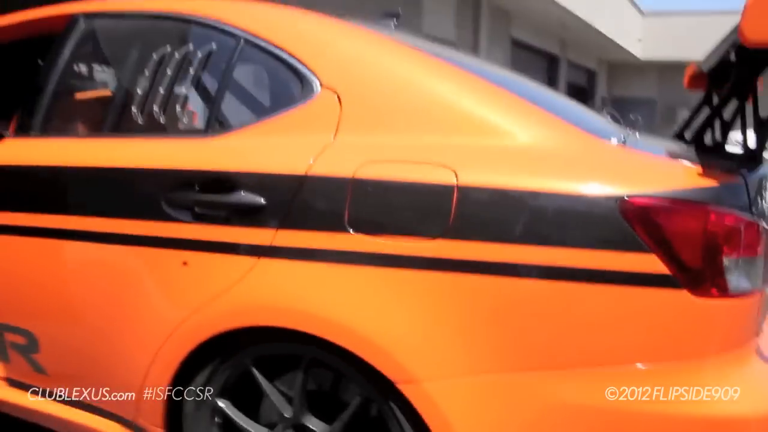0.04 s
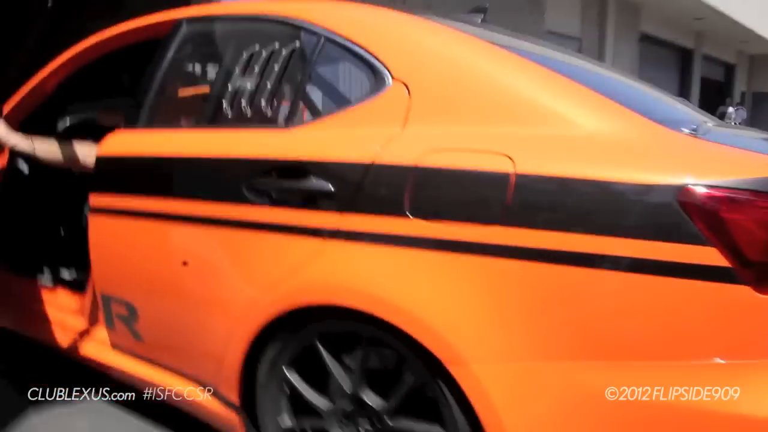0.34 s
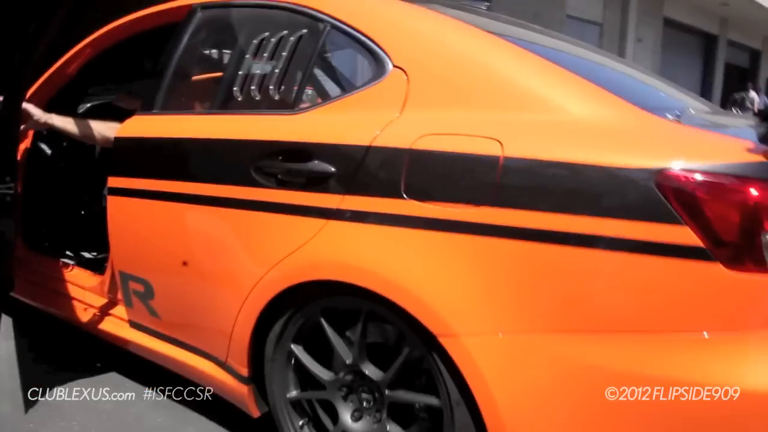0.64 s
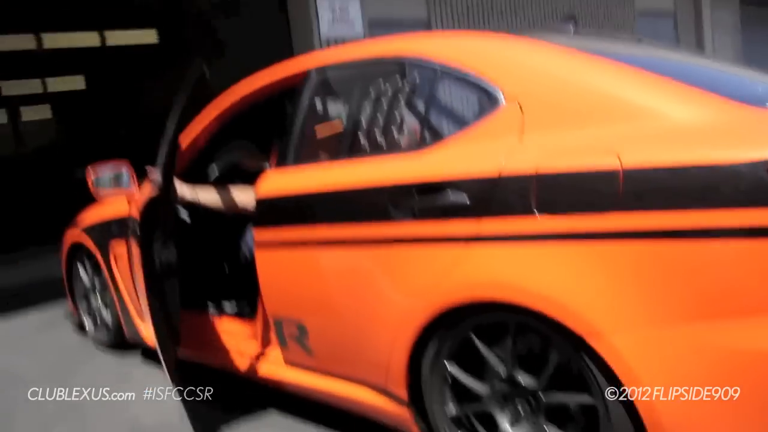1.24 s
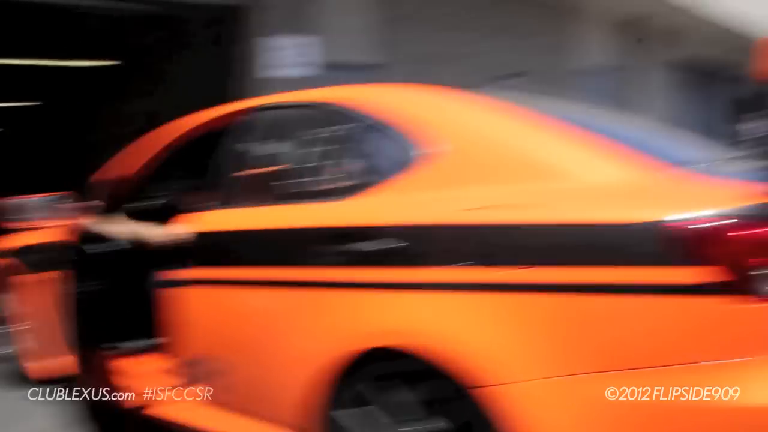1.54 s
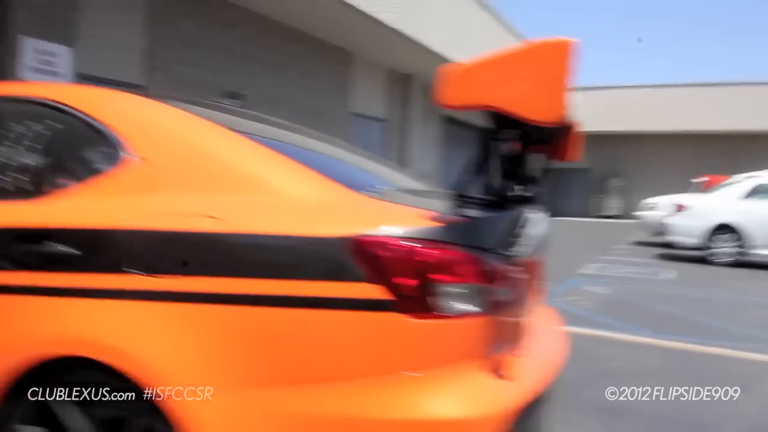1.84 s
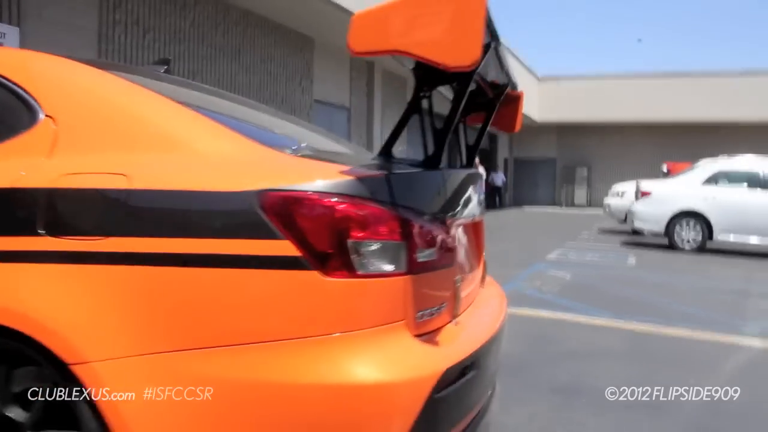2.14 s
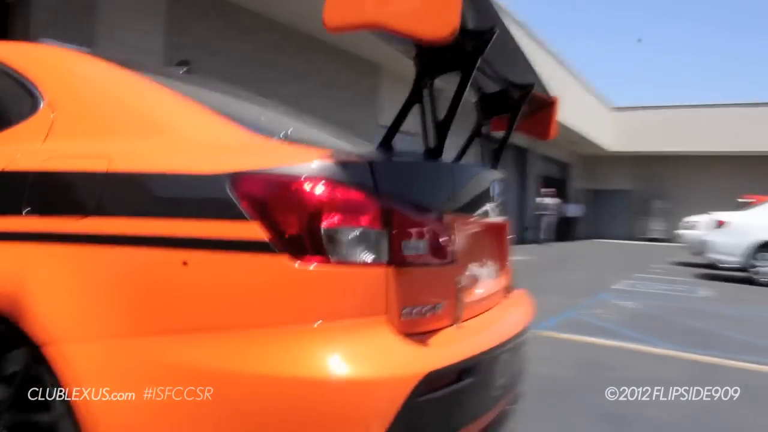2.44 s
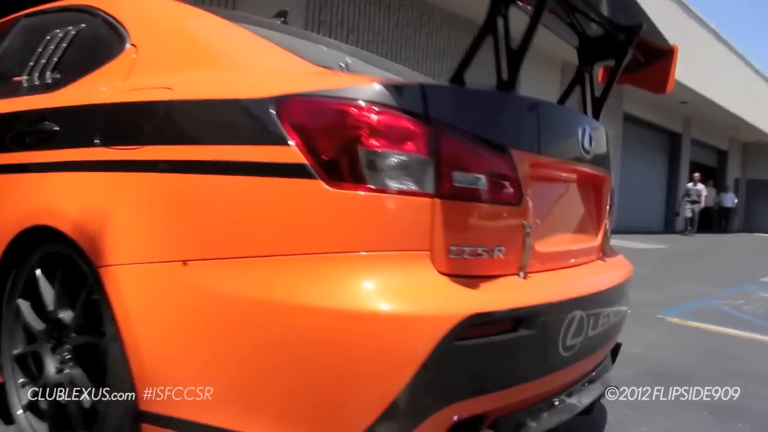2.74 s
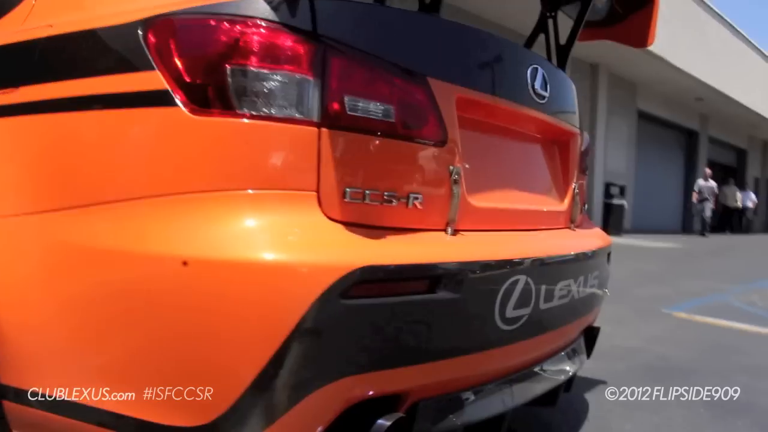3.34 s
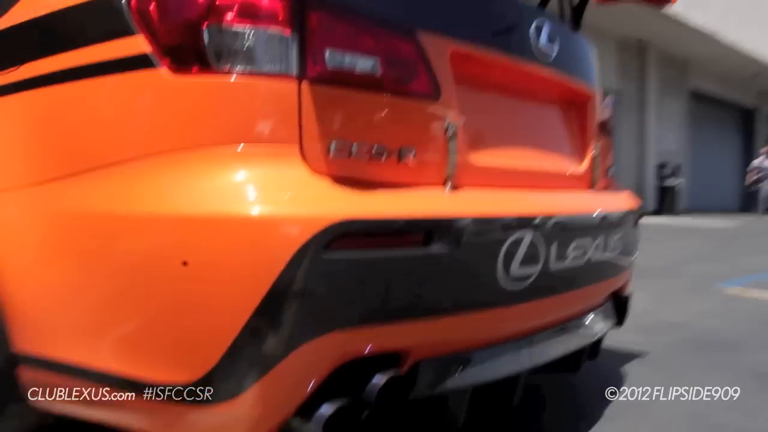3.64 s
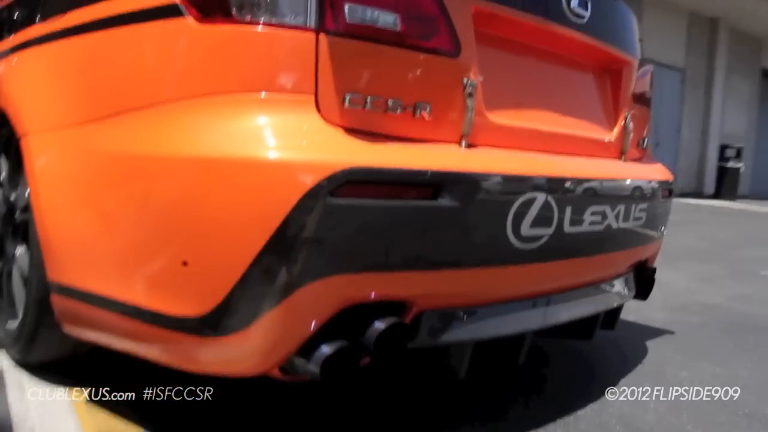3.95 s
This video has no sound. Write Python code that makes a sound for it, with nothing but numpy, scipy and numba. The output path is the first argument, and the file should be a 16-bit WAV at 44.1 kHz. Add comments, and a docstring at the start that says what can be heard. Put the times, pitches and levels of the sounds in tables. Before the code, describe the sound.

A race car engine idles with a low burble, then revs up with exhaust cracks, winds down and revs again, higher. It is parked beside a building, and the close microphone overloads slightly on the revs.

```python
"""A cross-plane V8 race car idles, then revs twice, close by in a parking lot.
Its two banks fire unevenly into the tailpipes: an even firing tone, a loping beat between the banks
and a rasp of gas, with cracks, barks and booms on the throttle. The revs overload the microphone,
and the gain control pushes the hiss of the engine bay down."""
import sys
import numpy as np
from scipy import signal
from scipy.fft import rfft, irfft
from scipy.io import wavfile
from numba import njit

SR = 44100
rng = np.random.default_rng(int(sys.argv[2]) if len(sys.argv) > 2 else 0)


def to_wav(sig):
    """Store sig (one row per channel, or 1-D mono) as 16-bit WAV at the path in sys.argv[1].

    Samples outside -1..1 are clipped; the rate is SR.
    """
    pcm = np.clip(np.atleast_2d(sig), -1, 1) * 32767
    pcm = np.round(pcm).astype(np.int16)
    wavfile.write(sys.argv[1], SR, pcm.T)  # frames by channels


N = 176400

# engine speed: t/s, four-stroke cycle rate/Hz
SPEED = [(0, 7.2), (1.14, 7.2), (1.25, 8.7), (1.4, 13.5), (1.45, 16.2), (1.58, 24.3), (1.76, 34.6),
         (1.88, 41), (2.0, 47.4), (2.07, 49.5), (2.15, 49), (2.4, 44), (2.67, 38.2), (3.08, 31),
         (3.25, 28.8), (3.37, 28.5), (3.43, 30.4), (3.67, 42.8), (3.84, 52.4), (3.93, 55.2), (4, 55.1)]
# exhaust under throttle: t/s, bank beat/dB, firing tone/dB, rasp/dB, firing scatter/share
EXHAUST = [(1.17, -45, -30, -31, .2), (1.25, -2, -2, -21, 0.07), (1.41, -17.5, 4, -18, 0.31),
           (1.55, 11, 11, -22, 0.24), (1.75, 17.5, 16, -1.5, 0.076), (1.9, 21, -5, -21, 0.087),
           (2.0, 15, 12, 8.5, 0.097), (2.12, 16, 1.5, -5.5, 0.37), (2.22, 15, 10.5, -7.5, 0.029),
           (2.55, 16.5, -5, -8.5, .03), (2.8, 14, -35, -11, 0.03), (2.95, 10.5, -52, -15, .04),
           (3.35, 6.5, -32, -20, 0.26), (3.41, 14, 7, -14, .13), (3.6, 18, 6.5, -3.5, 0.14),
           (3.83, 17.5, 21, 5, 0.1), (4.0, 13.5, 16, -5.5, 0.31)]
# pipe response to barks and cracks: f/Hz, gain/dB
BARK_PIPE = [(100, 9.5), (1050, 13), (2500, -5), (16000, -33)]


def undb(db):
    """Decibels to gain."""
    return 10 ** (np.asarray(db) / 20)


def curve(rows, at, column=1):
    """One table column, linearly interpolated."""
    rows = np.array(rows, float)
    return np.interp(at, rows[:, 0], rows[:, column])


def colour(x, response):
    """Minimum-phase filter; response: f/Hz, gain/dB."""
    size = 2 ** 18
    hz, db = np.array(response, float).T
    f = np.maximum(np.arange(size // 2 + 1) * SR / size, 1)
    cepstrum = irfft(np.log(undb(np.interp(np.log(f), np.log(hz), db))))
    cepstrum[1:size // 2] *= 2
    cepstrum[size // 2 + 1:] = 0
    return irfft(rfft(x, size) * np.exp(rfft(cepstrum)))[:N]


def pulses(times_s, sizes):
    """A click at each time, split between two samples."""
    whole, part = np.divmod(np.clip(times_s * SR, 0, N), 1)
    whole = whole.astype(int)
    clicks = np.bincount(whole, sizes * (1 - part), N + 2) + np.bincount(whole + 1, sizes * part, N + 2)
    return clicks[:N]


@njit
def follow(x, start, attack_s, release_s):
    """One-pole level follower."""
    attack, release = 1 / (attack_s * SR), 1 / (release_s * SR)
    out, level = np.empty(len(x)), start
    for i in range(len(x)):
        level += (x[i] - level) * (attack if x[i] > level else release)
        out[i] = level
    return out


def resonance(hz, width_hz):
    """Noise ringing in one resonance, rms 1."""
    ring = signal.lfilter(*signal.iirpeak(hz, hz / width_hz, SR), rng.standard_normal(N))
    return ring / np.std(ring)


def gas(envelope, pipe):
    """Turbulent puffs coloured by the pipe mouth; the envelope sets the rms."""
    puffs = colour(rng.standard_normal(N) * envelope, pipe)
    return puffs / np.std(colour(rng.standard_normal(N), pipe))


def engine_bay(t):
    """Hiss and a ringing belt drive that scuffs twice."""
    # hiss spectrum: f/Hz, gain/dB
    hiss_spectrum = [(40, -42), (200, 7.5), (1020, 0), (1350, -3.5), (2400, -6), (6800, -11), (11400, -18),
                     (16000, -31)]
    # hiss envelope: t/s, level/dB
    hiss_db = [(0, -26), (1.15, -20.5), (1.5, -21.5), (2.1, -5), (2.8, -23.5), (3.0, -18), (3.3, -25.5),
               (4, -17)]
    # belt resonances: f/Hz, width/Hz, level at idle/dB
    belt_modes = [(1886, 5.8, -32.5), (1612, 70, -34)]
    # belt scuffs: t/s, half-width/s, rise/dB
    scuffs = [(0.365, 0.023, 5), (.945, .017, 6.5)]
    scuff_gain = undb(sum(db * np.exp(-((t - at) / width) ** 2) for at, width, db in scuffs))
    belt_gain = np.sqrt(SPEED[0][1] / curve(SPEED, t))  # rings most at idle
    belt = belt_gain * sum(undb(db) * resonance(hz, width) for hz, width, db in belt_modes)
    hiss = colour(rng.standard_normal(N), hiss_spectrum)
    return scuff_gain * (hiss / np.std(hiss) * undb(curve(hiss_db, t)) + belt)


def booms(t):
    """A low pipe resonance swells and dies as the throttle snaps open or shut."""
    # booms: t/s, half-width/s, f/Hz, level/dB
    swells = [(1.2, .028, 173, 5.5), (2.125, 0.031, 140.6, 12.5), (3.968, 0.038, 99, 15)]
    return sum(undb(db) * np.exp(-((t - at) / width) ** 2) * np.sin(2 * np.pi * hz * (t - at))
               for at, width, hz, db in swells)


def cracks(t, decay_s=.004):
    """Single hard firings burst from the pipe as the engine picks up."""
    # hard firings: t/s, level/dB
    bursts = [(1.289, -8), (1.427, 4), (1.487, 7), (1.538, 9), (1.582, 9), (1.68, 10), (3.259, -2),
              (3.363, 0), (3.468, 14)]
    envelope = sum(undb(db) * (t >= at) * np.exp(-np.abs(t - at) / decay_s) for at, db in bursts)
    return gas(envelope, BARK_PIPE)


def barks(t, decay_s=.006):
    """Under load the loudest cylinder blasts from the pipe once a cycle."""
    # bark envelope: t/s, level/dB
    bark_db = [(1.3, -70), (1.7, -10), (1.83, 9), (1.99, 17), (2.1, -30), (3.35, -30), (3.43, 2), (3.58, 5),
               (3.62, 15), (3.76, 22), (3.86, 19), (3.92, 3)]
    anchors_s = (1.838, 3.619)  # one bark per rev times the rest
    cycle_hz = curve(SPEED, t)
    cycle = np.cumsum(cycle_hz) / SR
    anchor_cycle = np.where(t < np.mean(anchors_s), *np.interp(anchors_s, t, cycle))
    age_s = (cycle - anchor_cycle) % 1 / cycle_hz
    return gas(undb(curve(bark_db, t)) * np.exp(-age_s / decay_s), BARK_PIPE)


def snarl(t):
    """Clean pipe overtones glide with the engine and mellow as it runs down."""
    # overtones: multiple of cycle rate, level before tilt/dB re bank beat
    overtones = [(6, -14), (10, -15), (12, -21), (13, -20), (15, -21), (18, -22), (20, -23), (21, -21),
                 (23, -22), (25, -21), (26, -24), (28, -24)]
    # brightness: t/s, tilt about the 10th multiple/(dB/octave)
    brightness = [(2.15, -4), (2.8, -3.5), (2.95, -8), (3.33, -6), (3.42, 4), (3.75, 0.5)]
    cycle = np.cumsum(curve(SPEED, t)) / SR
    tilt = curve(brightness, t)
    tones = sum(undb(db + tilt * np.log2(k / 10)) * np.sin(2 * np.pi * (k * cycle + rng.random()))
                for k, db in overtones)
    return tones * undb(curve(EXHAUST, t))


def exhaust(t, valve_hz=1260):
    """Eight firings a cycle ring the pipes; each lets out a puff of rasping gas."""
    # firing order: strength signed by bank, rasp/dB, lag/firing intervals
    cylinders = [(1, 11, 0.02), (-0.36, -14, -0.024), (-0.54, -1, -0.00092), (0.63, 7, 0.097),
                 (-0.58, 6, -0.067), (0.28, -1, -0.032), (0.63, -30, 0.046), (-0.77, 5.5, -0.074)]
    # low-speed burble: t/s, level/dB
    burble_db = [(0, -24), (1.12, -19.5), (1.22, -4.5), (1.4, -26)]
    # pipe responses to burble, bank beat, firing tone and rasp: f/Hz, gain/dB
    burble_pipe = [(40, -14.5), (57, 6.5), (80, 17.5), (97, 10), (115, 18.5), (136, 5.5), (160, 0),
                   (195, 14), (240, -3.5), (310, -4.5), (420, -22.5), (1000, -92)]
    beat_pipe = [(30, -31), (84, 4.5), (105, -4.5), (170, 5), (235, 0.5), (300, -6.5), (550, -19),
                 (850, -30.5), (1400, -43.5)]
    tone_pipe = [(30, -35), (65, 9), (110, 3), (270, 0), (400, -10), (600, -36), (2000, -33.5)]
    rasp_pipe = [(60, 10.5), (500, 12.5), (1050, 7.5), (1500, -0.5), (4000, -12.5), (16000, -37)]
    jitter, puff_decay = .12, .67  # firing intervals; jitter at full scatter

    firing_hz = len(cylinders) * curve(SPEED, t)
    count = np.cumsum(firing_hz) / SR
    firing = np.arange(int(count[-1]) + 1)
    time_noise, tone_noise, beat_noise, puff_noise = rng.standard_normal((N // 100, 4))[firing].T
    bank, rasp_db, lag = np.array(cylinders)[firing % len(cylinders)].T
    scatter = curve(EXHAUST, np.interp(firing, count, t), column=4)
    fire_s = np.interp(firing + lag + jitter * scatter * time_noise, count, t)
    interval_samples = SR / np.interp(fire_s, t, firing_hz)

    def ring(pipe, db, strength):
        return colour(pulses(fire_s, interval_samples * undb(db) * strength), pipe)

    burble = ring(burble_pipe, curve(burble_db, fire_s), 1 + .55 * bank + .06 * beat_noise)
    beat = ring(beat_pipe, curve(EXHAUST, fire_s, column=1), bank + scatter * beat_noise)
    tone = ring(tone_pipe, curve(EXHAUST, fire_s, column=2), 1 + scatter * tone_noise)
    puff_peak = undb(rasp_db + 1.6 * puff_noise)[count.astype(int)]
    flow = 1 + puff_peak * np.exp(-(count % 1) / puff_decay)
    rasp = gas(flow * undb(curve(EXHAUST, t, column=3)), rasp_pipe)
    # valves open gradually and round each pulse
    band = signal.butter(3, [38, valve_hz], "band", fs=SR, output="sos")
    return signal.sosfilt(band, burble + beat + tone) + rasp


def scene(wall_db=-20, wall_decay_s=.06):
    """The car and a short scatter from the building beside it."""
    t = np.arange(N) / SR
    car = exhaust(t)
    for _ in range(2):  # two layers, independent phases and noise
        car += snarl(t) + barks(t)
    car += cracks(t) + booms(t)
    tail = rng.standard_normal(N) * np.exp(-t / wall_decay_s)
    wall = signal.fftconvolve(car, tail / np.linalg.norm(tail))[:N]
    return (car + undb(wall_db) * wall + engine_bay(t))[None]


def record(dry):
    """The microphone saturates, a low cut turns flat tops into spikes, gain control holds the level."""
    limit, knee, bias = undb(16), 33, .094
    low_cut_hz, treble_hz, top_hz = 145, 2200, 15600
    agc_threshold, out_db = .59, -5.5
    drive = dry[0] / limit + bias
    mic = limit * (drive / (1 + np.abs(drive) ** knee) ** (1 / knee) - bias)
    treble = signal.butter(2, treble_hz, "high", fs=SR)
    for _ in range(2):  # some treble escapes the overload
        mic += .3 * signal.lfilter(*treble, dry[0] - mic)
    thin = signal.lfilter(*signal.butter(1, low_cut_hz, "high", fs=SR), mic)
    level = follow(np.abs(thin), agc_threshold, attack_s=.034, release_s=.41)
    agc_gain = agc_threshold / np.maximum(level, agc_threshold)
    out = np.clip(undb(out_db) * agc_gain * thin, -1, 1)
    return signal.sosfilt(signal.ellip(10, .1, 80, top_hz, fs=SR, output="sos"), out)[None]


dry = scene()
out = record(dry)
to_wav(out)
```